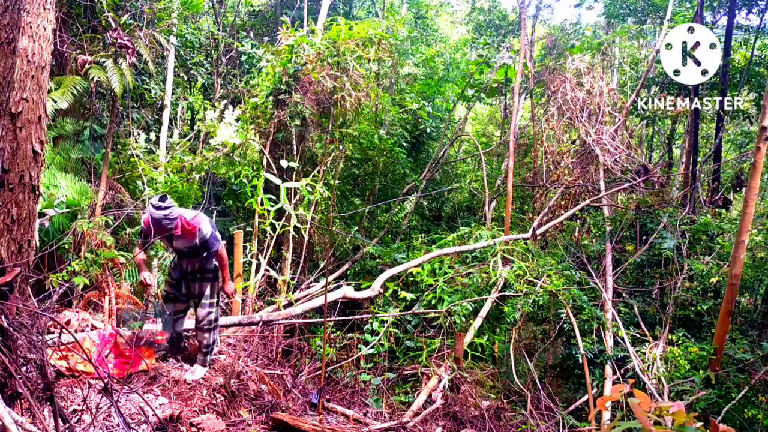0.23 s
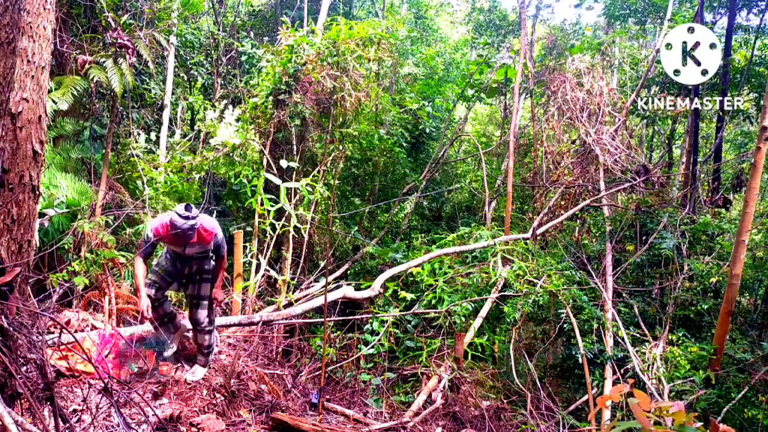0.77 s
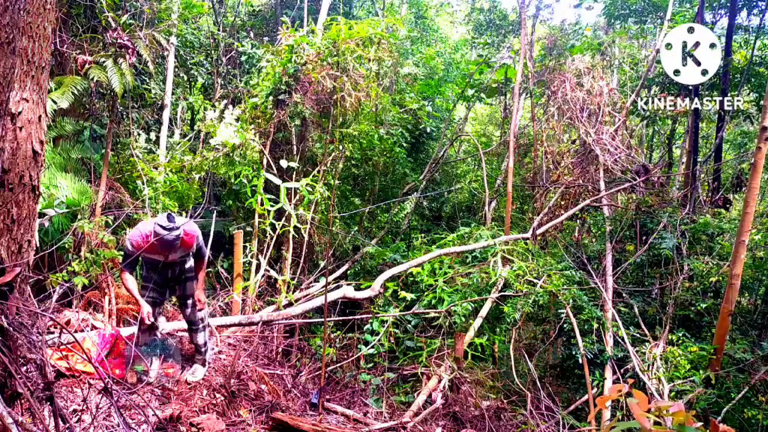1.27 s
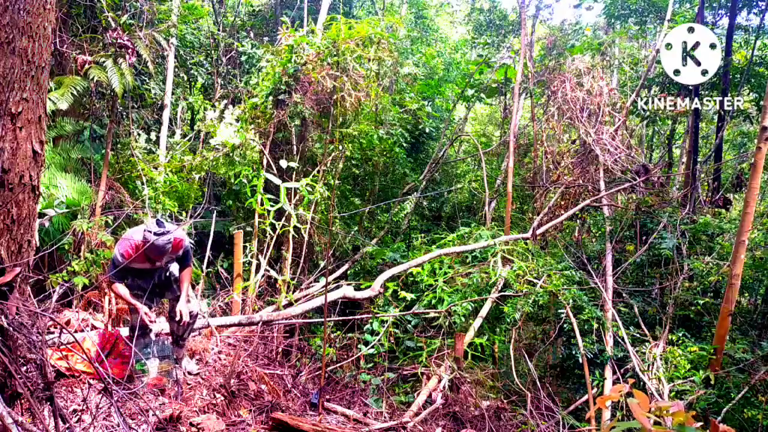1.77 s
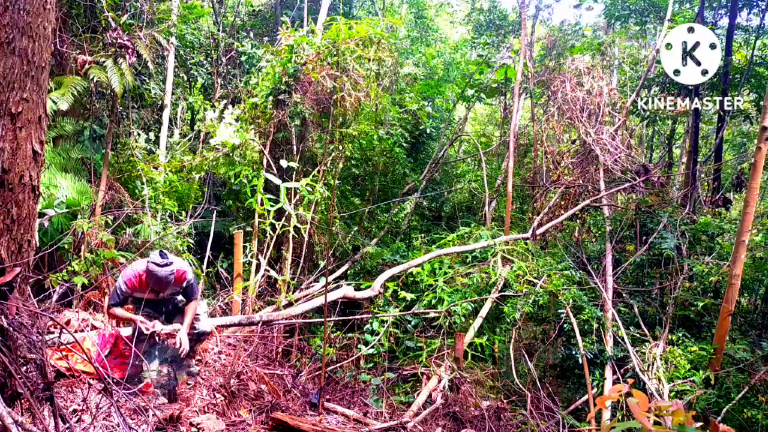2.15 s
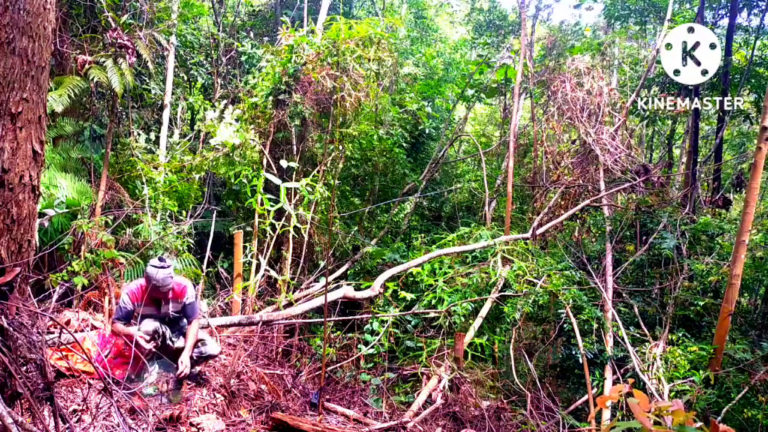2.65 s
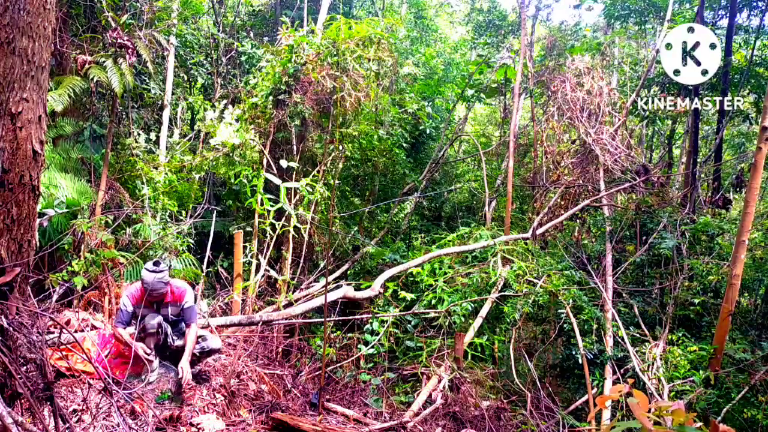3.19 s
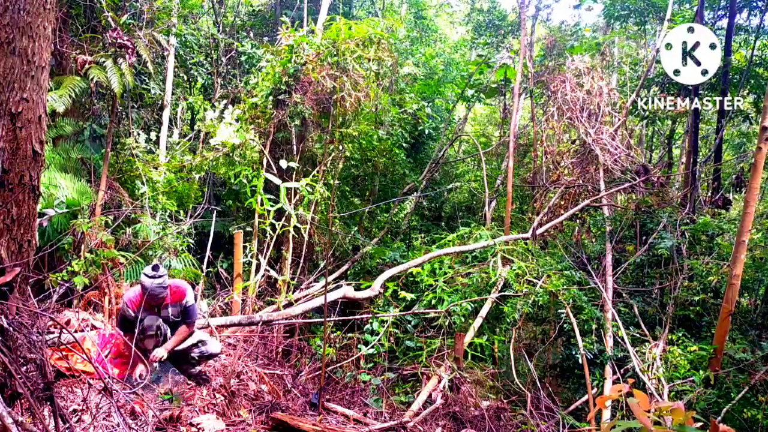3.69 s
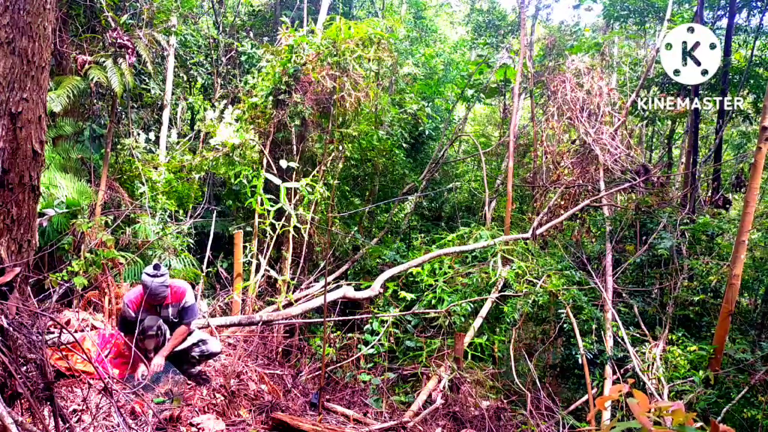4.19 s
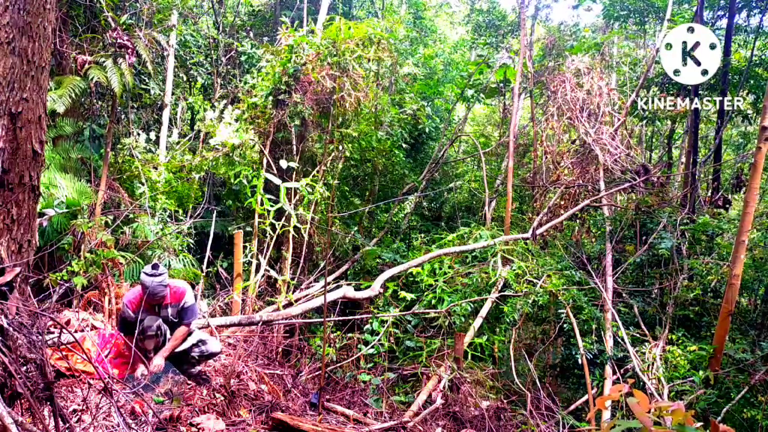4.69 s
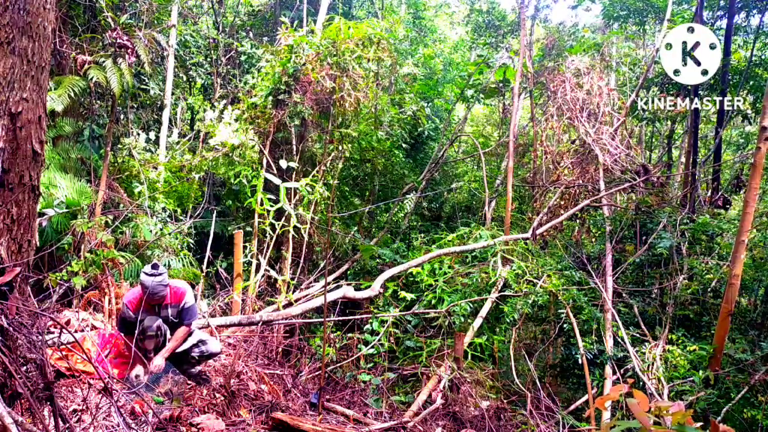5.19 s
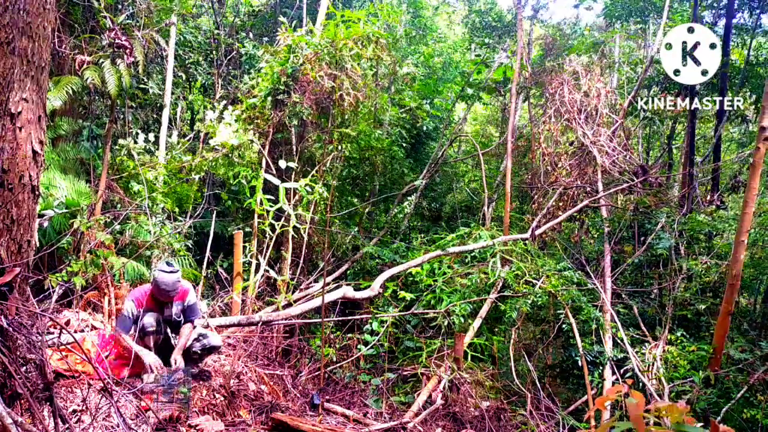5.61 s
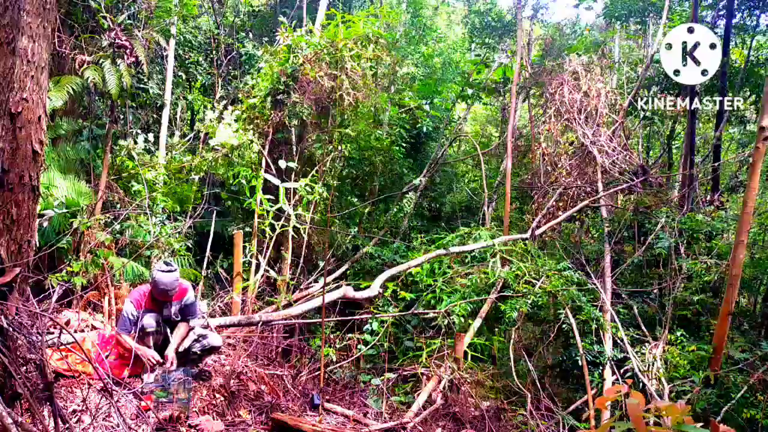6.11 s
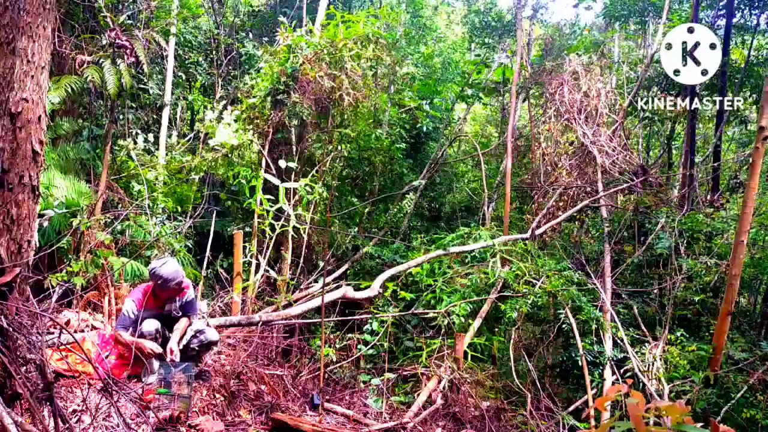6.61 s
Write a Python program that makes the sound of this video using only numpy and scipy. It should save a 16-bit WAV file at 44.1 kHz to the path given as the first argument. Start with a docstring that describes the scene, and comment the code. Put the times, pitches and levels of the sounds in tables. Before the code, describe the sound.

Outdoors in a forest, a cicada pulses in a bright raspy trill, nearly five throbs a second, each swooping in pitch. Twigs and gear click and snap in the first few seconds, with dry leaves crackling briefly. Faint crickets and a very high hiss lie behind. Low wind bumps the microphone. The cicada cuts off late, leaving a short scattered tail, cricket, air and breeze.

```python
"""A cicada throbs from the start, clicks ringing a body whose pitch arches up as the abdomen lifts.
A cricket's wavering tone and a very high buzz of noise sound with it; a second cricket chirps in runs.
Snaps and knocks come early, dry leaves crackle from 1.6 s, and shaped noise makes a breeze throughout.
The buzz drops sharply at 4.2 s and dies away; the cicada stops abruptly near 5.5 s, scattered tails following."""
import sys
import numpy as np
from scipy import signal
from scipy.fft import rfft, irfft
from scipy.io import wavfile
from scipy.ndimage import uniform_filter1d

SR = 44100
rng = np.random.default_rng(int(sys.argv[2]) if len(sys.argv) > 2 else 0)


def generate_wav(signal):
    """Clip the signal to [-1, 1] and save it as 16-bit WAV at the path in sys.argv[1]."""
    frames = np.transpose(np.atleast_2d(signal))
    scaled = np.clip(frames, -1, 1) * 32767
    pcm = np.round(scaled).astype(np.int16)
    wavfile.write(sys.argv[1], SR, pcm)


N = 302075

# Tops of the cicada's throbs. Each row: time in seconds, base level in dB.
THROB_TOPS = [(0.102, -56), (0.33, -56), (0.545, -55.5), (0.758, -56), (0.962, -55), (1.154, -55.5),
              (1.36, -55), (1.58, -55.5), (1.795, -54), (2.007, -55), (2.221, -55.5), (2.432, -56),
              (2.638, -55.5), (2.854, -55.5), (3.079, -55.5), (3.296, -55.5), (3.512, -56.5), (3.751, -55),
              (3.954, -55.5), (4.152, -55.5), (4.365, -56), (4.578, -56.5), (4.802, -55), (5.022, -55.5),
              (5.231, -55.5), (5.447, -56.5)]
# One pump from top to top. Each row: share of the throb (0-1), abdomen lift (0-1), effort in dB.
PUMP_CYCLE = [(0, 0.98, 2.5), (.15, 0.96, 0), (.3, .65, -4), (.45, 0.19, -4.5), (.6, 0.16, -3),
              (.7, 0.18, 1.5), (.8, 0.81, 2), (0.902, 0.89, 1), (1, 1, 1)]
# Resonances of drum and abdomen. Each row: frequency lowered in Hz, frequency lifted in Hz,
# width of each smoothing stage in Hz, level lowered in dB, level lifted in dB.
BODY_RINGS = [(2780, 2860, 175, -20, -22), (2540, 3160, 380, -12, -15), (2710, 3460, 400, -24.5, -13.5),
              (5160, 6200, 360, -3, -4), (5810, 6570, 640, -3.5, -0.5), (6830, 7440, 1800, -6, -9.5),
              (7500, 9560, 1740, -13, -12), (12000, 11700, 3100, -10.5, -17.5)]
# Ring strongest at full lift. One row: frequency in Hz, stage width in Hz, mean level in dB.
LIFTED_RING = (16000, 500, -20.5)
STOP_S, STOP_FADE_S = 5.49, 0.0085
CLICKS_PER_S, RATE_WANDER = 225, .06  # mean rate, rms share of its slow wander
WEAK_SIDE, RASP = 0.82, 0.77  # amplitude of the weaker drum; rib noise, before its growth with lift
REACH_SPREAD, LIFTED_RING_SPREAD_DB = 0.038, 7  # chance from throb to throb, rms
LIFT_TILT_DB = 0.35  # level at full lift less that at none, besides the effort
FOREST_T60_S, FOREST_DB = 0.35, 1.5  # decay by 60 dB; tail level against the direct sound
PATHS, SWAY_S = 5, .37  # number of scattered paths; time from one path's turn to the next

CRICKET_HZ, CRICKET_DB = 6050, -70.5
STROKES_PER_S, TRIPLE_START_S = 41.8, 6.138  # one moment at which a group of three begins

# Runs of the second cricket. Each row: first start in seconds, end of starts in seconds, mean tone peak in dB.
CHIRP_RUNS = [(.27, 1.1, -72), (3.44, 4.3, -68), (4.48, 4.55, -72)]
CHIRP_HZ, CHIRP_S, CHIRP_EVERY_S, CHIRP_SPREAD_DB = 4605, .06, .1158, 1.8

# Level of the high buzz. Each row: time in seconds, level in dB.
BUZZ_LEVEL = [(0, -60), (2.3, -63), (3.2, -58.5), (3.9, -55.5), (4.21, -55), (4.29, -64), (4.73, -67),
              (6.85, -72)]
BUZZ_HZ, BUZZ_STAGE_WIDTH_HZ, BUZZ_PER_S = 15060, 2700, 61

# Snaps of twigs and gear. Each row: start in seconds, peak in dB, frequency in Hz,
# stage width in Hz, time in seconds for the noise to decay to 1/e.
SNAPS = [(.0393, -36.5, 7600, 4000, 0.0012), (.0524, -47, 12000, 6000, 0.0013),
         (.6225, -41, 7900, 3000, 0.0011), (1.2815, -49, 7900, 3000, 0.00073),
         (1.5608, -31, 3480, 5970, 0.0015), (1.5655, -34, 3080, 4000, 0.0027),
         (1.5655, -34, 9600, 4000, 0.0037), (1.5844, -34, 7500, 4000, 0.0027),
         (1.5915, -39, 2840, 2500, .004), (1.5938, -39, 12200, 6000, 0.0027),
         (1.6272, -38, 13000, 6000, 0.0011), (1.6442, -36, 14100, 3000, 0.0081),
         (1.6664, -36, 8800, 8000, 0.0056), (1.8153, -38.5, 13860, 5070, 0.011),
         (1.8165, -41, 2500, 4000, 0.0048), (1.8911, -36, 10000, 8100, .0007),
         (2.0214, -41, 9740, 4010, .001), (2.1231, -37.5, 7700, 3980, 0.0011),
         (2.4784, -44, 15100, 1996, 0.0022), (2.4942, -39.5, 13500, 4000, 0.0032),
         (2.595, -42, 12700, 4000, 0.0011), (3.6532, -34.5, 7600, 1510, 0.0012)]
# Hollow knocks. Each row: start in seconds, starting amplitude in dB, frequency in Hz, 60 dB decay in seconds.
KNOCKS = [(1.817, -38.5, 970, 0.0098), (0.054, -40, 1500, 0.006)]
# Stirs of dry leaves. Each row: start in seconds, level before decay in dB, 60 dB decay in seconds.
LEAF_STIRS = [(1.562, -46.5, 0.18), (1.585, -50, 0.98), (1.666, -46, 0.15), (1.815, -51.5, 1.2),
              (2.02, -64, 0.36)]
# Spectrum of the leaf crackle. Each row: frequency in Hz, relative gain in dB.
LEAF_SPECTRUM = [(180, -33), (400, -10), (1300, -2), (3000, -1.5), (6000, 0.5), (9000, 1), (12000, -1),
                 (15500, 0.5)]
STIR_RISE_S, GRAINS_PER_S = 0.0063, 5000

# Breeze on the microphone between gusts. Each row: time in seconds, mean level in dB.
BREEZE_LEVEL = [(0, -54.5), (.8, -56), (1.0, -49), (1.3, -49), (1.6, -49), (1.75, -54), (2.0, -47),
                (2.6, -45.5), (3.1, -48), (3.5, -48.5), (4.2, -50.5), (4.5, -46.5), (5.3, -47),
                (5.6, -50.5), (5.7, -59.5), (6.05, -54), (6.3, -50.5), (6.85, -50.5)]
# Spectrum of the breeze. Each row: frequency in Hz, relative gain in dB.
RUMBLE_SPECTRUM = [(4, -13), (9, 2.5), (25, 2.5), (45, -4.5), (65, -8), (100, -19), (150, -32), (260, -51)]
# Gusts that swell the rumble. Each row: time of the top in seconds, level added there in dB.
GUSTS = [(.68, -49), (.92, -47.5), (1.16, -52), (2.15, -38), (2.29, -59), (2.44, -49), (2.859, -46),
         (3.321, -41), (3.62, -44), (3.758, -57), (4.022, -34.5), (4.14, -41.5), (4.772, -38), (4.9, -48),
         (5.02, -54), (5.44, -34.5), (5.57, -45.5), (6.41, -34.5)]
# Single pushes of air. Each row: start in seconds, peak in dB.
BUFFETS = [(2.436, -41.5), (2.522, -39.5), (4.019, -46), (4.118, -52), (4.774, -50), (5.01, -47),
           (5.278, -42.5), (5.414, -37.5), (5.445, -31.5), (6.293, -47.5), (6.391, -58), (6.529, -43)]
GUST_S, BUFFET_S = 0.016, 0.01518  # gust top to 1/e; whole length of a push

# Spectrum of far leaves, insects and microphone hiss. Each row: frequency in Hz, relative gain in dB.
AIR_SPECTRUM = [(60, -6), (250, -0.5), (500, -3), (1000, -3), (2000, -4), (3000, -4), (4200, -9.5),
                (5400, -9.5), (6500, -6.5), (7600, -6.5), (9500, -6), (11000, -10.5), (12300, -11),
                (13500, -11), (15300, -8.5)]
AIR_DB = -57.5

EDGE_HZ = 15500  # upper band limit


def gain_of(db):
    """Level: twenty decibels make a tenfold amplitude."""
    return 10 ** (np.asarray(db) / 20)


def evened(x):
    """Mean power: scales a signal to rms 1."""
    return x / np.sqrt(np.mean(x ** 2) + 1e-20)


def curve(rows):
    """Linear interpolation: reads a table of time and value at every sample."""
    return np.interp(np.arange(N) / SR, *np.transpose(rows))


def colour(x, spectrum):
    """Spectral shaping: weights each frequency by a gain read on a log axis, then sets rms 1."""
    hz = np.fft.rfftfreq(N, 1 / SR)
    table_hz, table_db = np.transpose(spectrum)
    db = np.interp(np.log(hz + 1), np.log(table_hz + 1), table_db)
    return evened(irfft(rfft(x) * gain_of(db), N))


def drift(size):
    """Slow random fluctuation: noise averaged twice over size samples, at rms 1."""
    once = uniform_filter1d(rng.standard_normal(N), size)
    return evened(uniform_filter1d(once, size))


def add(mix, s, sound):
    """Superposition: adds a sound into the mix from s seconds."""
    part = mix[round(s * SR):][:len(sound)]
    part += sound[:len(part)]


def resonate(x, hz, width):
    """Resonance by heterodyning: shifts hz to zero, smooths in two equal stages, shifts back."""
    turn = np.exp(2j * np.pi * np.cumsum(hz * np.ones(len(x))) / SR)
    r = np.exp(-np.pi * width / SR)
    smooth = signal.lfilter([(1 - r) ** 2], [1, -2 * r, r * r], x / turn + 1e-18)
    return 2 * (turn * smooth).real


def forest(x):
    """Multiple scattering: trunks and swaying leaves give decaying noise tails that take turns."""
    t = np.arange(SR // 2) / SR
    turn = np.arange(N) / SR / SWAY_S
    out = x.copy()
    for k in range(PATHS):
        tail = rng.standard_normal(len(t)) * gain_of(-60 * t / FOREST_T60_S)
        tail *= t > .004  # scattered sound arrives later than the direct
        from_top = (turn - k + PATHS / 2) % PATHS - PATHS / 2
        share = np.maximum(np.cos(np.pi * np.clip(from_top, -1, 1) / 2), 0)
        scattered = signal.fftconvolve(x * share, tail / np.linalg.norm(tail))[:N]
        out += gain_of(FOREST_DB) * scattered
    return out


def cicada():
    """Forced resonance: buckling clicks of two drums ring a body whose pitch rises with abdomen lift."""
    t = np.arange(N) / SR
    s, throb_db = np.transpose(THROB_TOPS)
    level_db = np.interp(t, s, throb_db)
    reach = np.interp(t, s, 1 + REACH_SPREAD * rng.standard_normal(len(s)))
    ring_chance_db = np.interp(t, s, LIFTED_RING_SPREAD_DB * rng.standard_normal(len(s)))

    turns = np.interp(t, [s[0] - .22, *s, s[-1] + 0.35], np.arange(len(s) + 2))
    share, *pump = np.transpose(PUMP_CYCLE)
    lift, effort_db = (uniform_filter1d(np.interp(turns % 1, share, c), size=600) for c in pump)

    # a faster jitter of the click rate grows with the lift
    wander = RATE_WANDER * drift(size=3000) + .06 * (.3 + lift) * drift(size=100)
    beats = np.cumsum(CLICKS_PER_S * (1 + wander)) / SR
    # the drums take turns, one weaker; the ribs add a rasp that grows with the lift
    clicks = np.diff(np.floor(beats), prepend=0) * np.where(beats % 2 < 1, 1, WEAK_SIDE)
    ribs = rng.standard_normal(N) * (1.1 + np.exp(-(beats % 1) / 0.37))
    drive = evened(clicks) + RASP * (1.06 + lift) * evened(ribs)

    body = np.zeros(N)
    for hz0, hz1, width, db0, db1 in BODY_RINGS:
        ring = resonate(drive, hz0 + (hz1 - hz0) * lift * reach, width)
        body += gain_of(db0 + (db1 - db0) * lift) * evened(ring)
    hz, width, db = LIFTED_RING
    body += gain_of(db + ring_chance_db) * lift ** 4 * evened(resonate(drive, hz, width))

    fade = np.clip((STOP_S - t) / STOP_FADE_S, 0, 1)
    song_db = level_db + effort_db + LIFT_TILT_DB * (lift - 0.5)
    return forest(gain_of(song_db) * body * fade)


def cricket():
    """Amplitude modulation: wing strokes pulse a wavering tone in threes, the last one faint."""
    strokes = (np.arange(N) / SR - TRIPLE_START_S) * STROKES_PER_S
    pulse = abs(np.sin(np.pi * strokes)) ** 2.3
    pulse *= np.where(strokes % 3 < 2, 1, .45) * gain_of(drift(size=1500))
    note = np.sin(2 * np.pi * np.cumsum(CRICKET_HZ + 30 * drift(size=300)) / SR)
    return gain_of(CRICKET_DB) * evened(note * pulse)


def chirps():
    """Tone and narrow-band noise: a second cricket's short thin notes at an even pace."""
    out, t = np.zeros(N), np.arange(0, CHIRP_S, 1 / SR)
    swell = np.sqrt(abs(np.sin(np.pi * t / CHIRP_S)))
    for first, end, db in CHIRP_RUNS:
        for s in np.arange(first, end, CHIRP_EVERY_S):
            tone = np.sin(2 * np.pi * CHIRP_HZ * t)
            breath = evened(resonate(rng.standard_normal(len(t)), CHIRP_HZ, 150))
            level = gain_of(db + CHIRP_SPREAD_DB * rng.standard_normal())
            add(out, s, level * (tone + 0.87 * breath) * swell)
    return out


def buzz():
    """Modulated band noise: an insect's raspy hiss near the top of hearing."""
    rasp = 1 + 0.12 * np.cos(2 * np.pi * BUZZ_PER_S * np.arange(N) / SR)
    hiss = resonate(rng.standard_normal(N) * rasp, BUZZ_HZ, BUZZ_STAGE_WIDTH_HZ)
    return gain_of(curve(BUZZ_LEVEL)) * evened(hiss)


def snaps_and_knocks():
    """Impulse response: twigs and gear give decaying bursts of band noise, hollow bodies decaying tones."""
    out, t = np.zeros(N), np.arange(3000) / SR
    for s, db, hz, width, decay_s in SNAPS:
        burst = rng.standard_normal(len(t)) * np.exp(-t / decay_s)
        crack = resonate(burst, hz, width) + 0.19 * burst
        add(out, s, gain_of(db) * crack / abs(crack).max())
    for s, db, hz, t60 in KNOCKS:
        add(out, s, gain_of(db - 60 * t / t60) * np.sin(2 * np.pi * hz * t))
    return out


def leaves():
    """Shot noise: sparse random grains of uneven size crackle under each dying stir."""
    grains = (rng.random(N) < GRAINS_PER_S / SR) * rng.choice([-1., 1.], N)
    grains *= gain_of(1.6 * np.minimum(rng.exponential(1, N), 4))
    stirred, since = np.zeros(N), np.arange(SR) / SR
    for s, db, t60 in LEAF_STIRS:
        rise = np.minimum(since / STIR_RISE_S, 1)
        add(stirred, s, rise * gain_of(db - 60 * since / t60))
    return stirred * colour(grains, LEAF_SPECTRUM)


def breeze():
    """Turbulent pressure: low noise swells with the gusts, and single pushes come where an eddy strikes."""
    t = np.arange(N) / SR
    lumps = rng.standard_normal(N) * gain_of(2.2 * drift(size=900))
    level = gain_of(curve(BREEZE_LEVEL) + 2.1 * drift(size=2500))
    for s, db in GUSTS:
        level += gain_of(db) * np.exp(-((t - s) / GUST_S) ** 2)
    out = level * colour(lumps, RUMBLE_SPECTRUM)
    u = np.linspace(-3, 3, int(BUFFET_S * SR))
    push = (1 - u ** 2) * np.exp(-u ** 2 / 2)  # a peak between two shallow dips
    for s, db in BUFFETS:
        add(out, s, gain_of(db) * push)
    return out


def air():
    """Stationary noise, nearly: a smooth far hiss with a slight swell."""
    return gain_of(AIR_DB + 0.36 * drift(size=5000)) * colour(rng.standard_normal(N), AIR_SPECTRUM)


def scene():
    """Superposition: all sources reach one microphone, heard alike on both channels."""
    near = cicada() + snaps_and_knocks() + leaves()
    far = cricket() + chirps() + buzz()
    return np.tile(near + far + breeze() + air(), (2, 1))


def record(dry):
    """Compression: a slow gain control, nearly deaf to rumble, eases loud sound; then the band limit."""
    heard = signal.sosfilt(signal.butter(2, 300, "high", fs=SR, output="sos"), dry[0])
    power = uniform_filter1d(heard ** 2, size=15000)
    over_db = np.maximum(10 * np.log10(power + 1e-12) + 58, 0)  # excess over -58 dB
    ducked = dry / gain_of(0.14 * over_db)
    low_pass = signal.firwin(1023, EDGE_HZ, window=("kaiser", 9), fs=SR)
    return signal.oaconvolve(ducked, low_pass[None], "same")


dry = scene()
out = record(dry)
generate_wav(out)
```